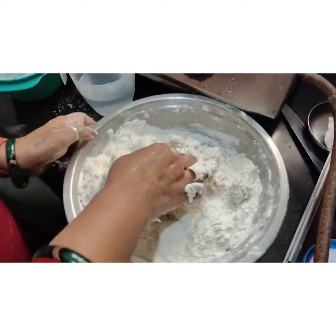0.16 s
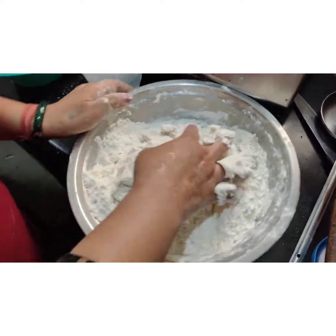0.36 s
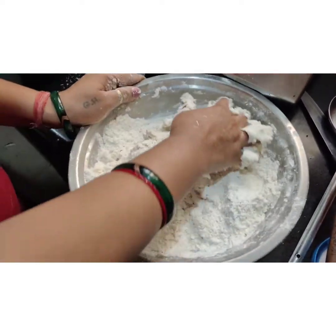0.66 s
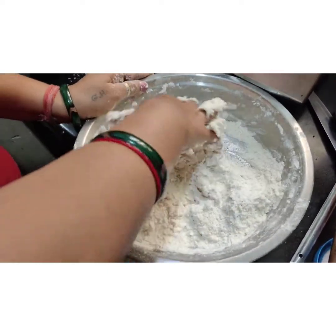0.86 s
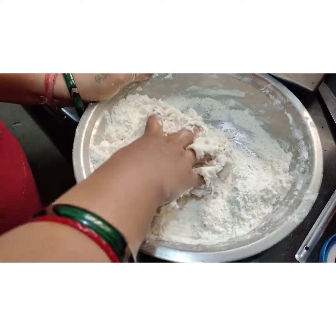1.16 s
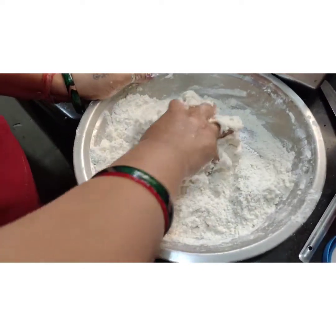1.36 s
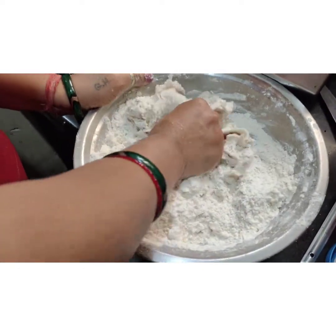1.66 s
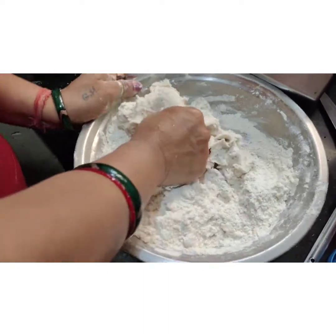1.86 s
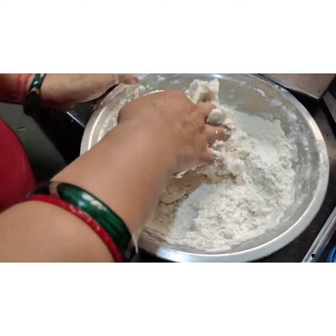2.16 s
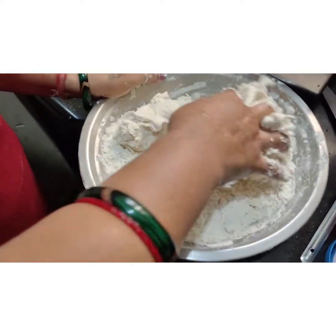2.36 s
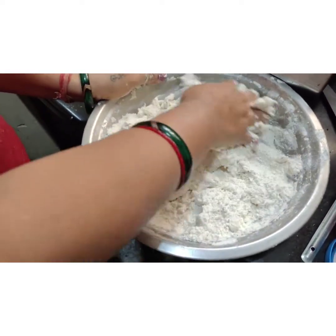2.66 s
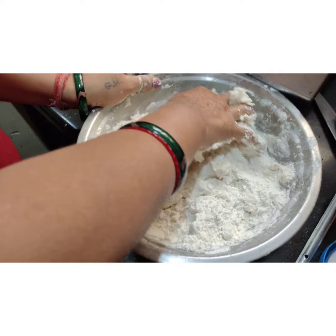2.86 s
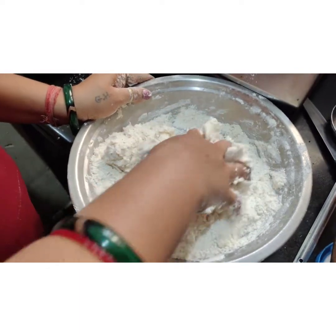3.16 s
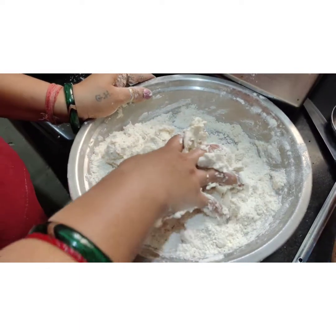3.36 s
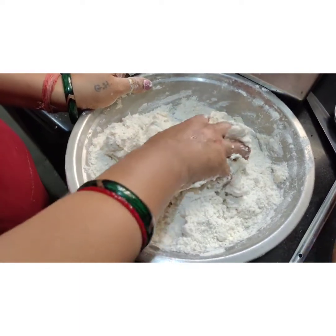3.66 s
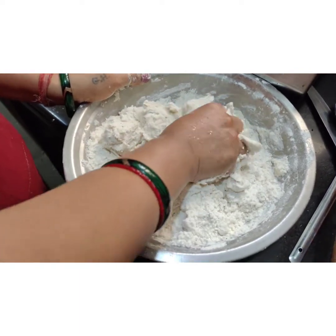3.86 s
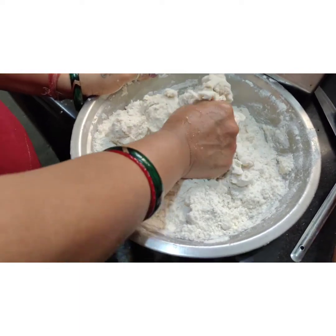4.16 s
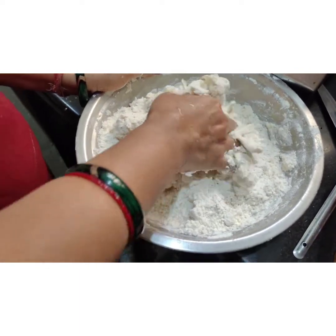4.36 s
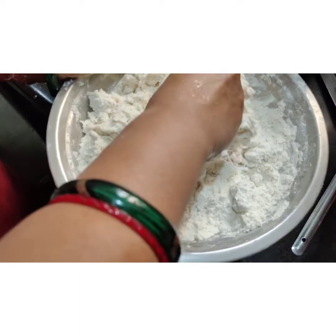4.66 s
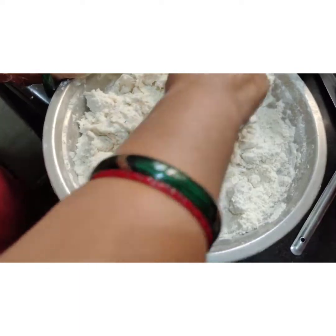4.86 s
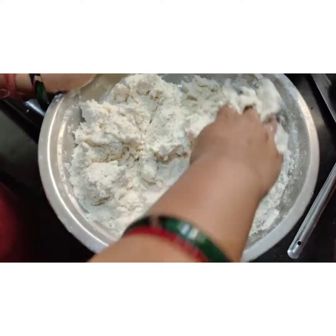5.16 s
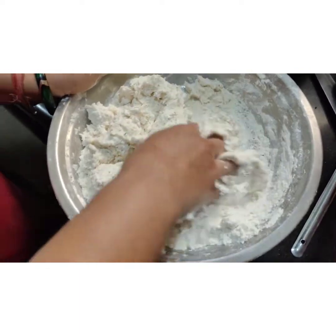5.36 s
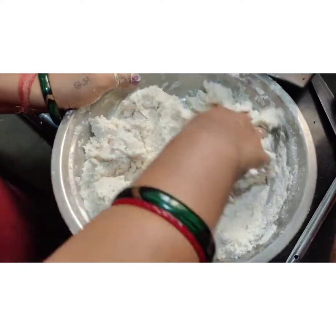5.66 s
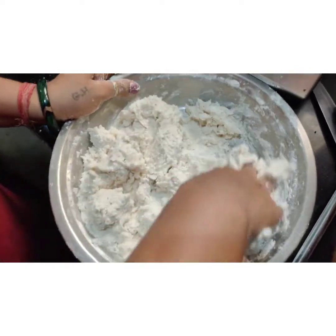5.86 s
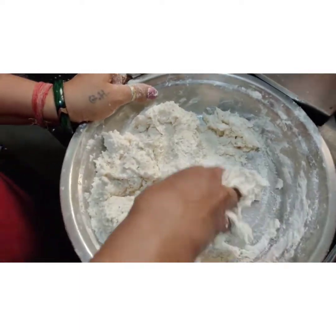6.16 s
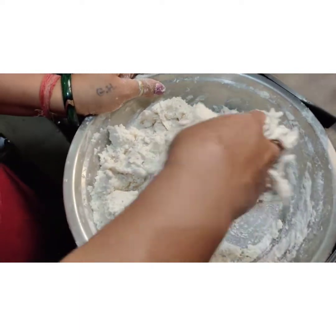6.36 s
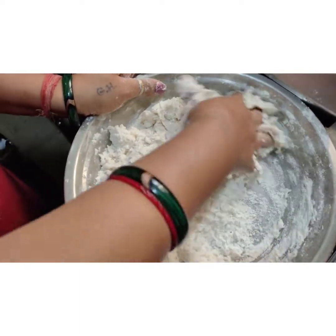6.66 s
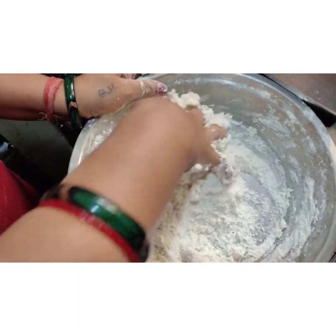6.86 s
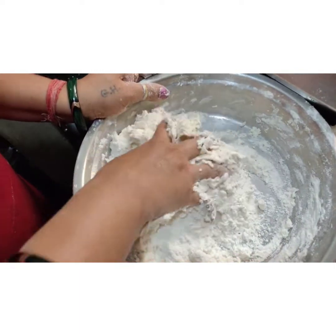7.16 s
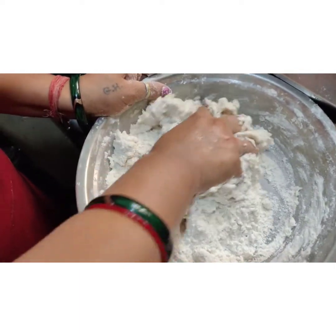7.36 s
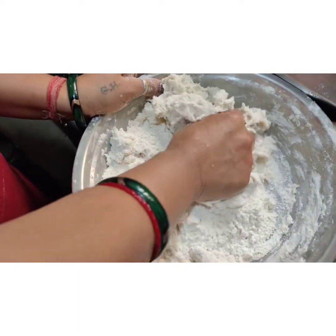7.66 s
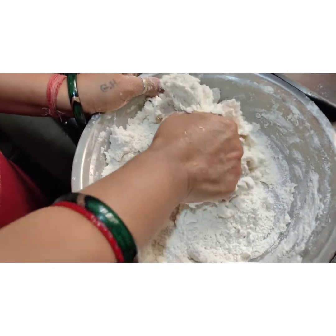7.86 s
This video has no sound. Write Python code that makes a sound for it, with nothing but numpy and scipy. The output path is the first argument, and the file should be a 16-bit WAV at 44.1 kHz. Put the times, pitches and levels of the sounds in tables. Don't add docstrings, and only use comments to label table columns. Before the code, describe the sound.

Dry flour hisses and crunches against a metal bowl as bangles clink and the base thumps, over a distant wavering drone in a kitchen.

```python
import sys
import numpy as np
from scipy import signal
from scipy.fft import rfft, irfft, next_fast_len
from scipy.io import wavfile
from scipy.ndimage import uniform_filter1d

SR = 44100
rng = np.random.default_rng(int(sys.argv[2]) if len(sys.argv) > 2 else 0)


def to_linear_factor(level_db):
    exponent = np.asarray(level_db, float) / 20
    return 10 ** exponent


def pcm_store(signal):
    levels = np.round(np.clip(np.atleast_2d(signal), -1, 1) * 32767)
    wavfile.write(sys.argv[1], SR, levels.astype(np.int16).T)


N = 353241

# pitch_hz, level_db (per Hz)
AIR_SPECTRUM = [(15, -60), (25, -20), (175, -1.5), (607, -4), (677, -16.5), (1840, -13), (4370, -28),
                (6000, -34.5), (13000, -29), (16000, -38)]
# pitch_hz, likeness (0-1)
MIC_LIKENESS = [(60, 0.64), (99, 0.58), (160, 1), (270, 0.96), (450, 0.7), (740, 0.31), (1220, 0.059),
                (2010, 0.15), (3330, 0.06), (5500, 0.92), (9080, 1), (15000, 0.11)]
# pitch_hz, left_minus_right_db
MIC_LEAN = [(60, 3), (92, 2), (140, 4.5), (210, -4), (330, 1), (500, -2.5), (770, -2), (1170, 1.5),
            (1790, 0), (2740, 7.5), (4190, 9.5), (6410, -0.5), (9810, -7), (15000, -19.5)]
# start_s, level_db
MOTOR_RUMBLE = [
    [(0.0, -52), (1.1, -56), (1.45, -50), (1.7, -65.5), (2.07, -85.5), (2.31, -55.5), (2.6, -60.5),
     (3.3, -54), (4.35, -65.5)],
    [(4.42, -92), (4.55, -49.5), (4.82, -82.5), (5.5, -95.5), (5.7, -60), (5.95, -81.5), (6.25, -64),
     (7.3, -67), (8.01, -80.5)],
]
# peak_s, rise_s, fall_s, level_db
DRONE_SURGES = [(0.08, .3, 0.24, -52.5), (0.75, 0.95, 0.56, -55), (1.07, 0.45, 0.08, -50.5),
                (1.27, 0.052, 0.11, -51.5), (1.42, 0.046, 0.11, -51), (1.83, 0.27, 0.23, -64),
                (2.36, 0.082, 0.11, -50.5), (2.86, .12, 0.049, -62), (3.44, 0.66, 0.2, -55.5),
                (3.73, 0.21, 0.056, -51.5), (4.19, 0.23, 0.3, -45.5), (4.35, 0.19, .3, -41.5),
                (4.53, 0.083, 0.28, -62), (5.28, 0.065, 0.36, -68.5), (5.61, 0.038, 0.074, -49.5),
                (6.5, 0.23, 0.55, -59), (6.95, 0.25, 0.21, -62.5), (7.24, 0.15, 0.35, -50.5),
                (7.449, 0.15, 0.26, -54.5), (7.93, 0.26, 0.075, -55.5)]
# start_s, pitch_hz, roughness (0-1)
DRONE_PITCH = [(0, 178, .7), (0.8, 175, .6), (1.4, 175, .6), (3.2, 175, .8), (3.95, 178, .7),
               (4.1, 181, .12), (4.36, 181, .12), (4.5, 177, .8), (7.0, 173, .6), (7.15, 172, .25),
               (7.6, 172, .3), (8.01, 176, .5)]
# start_s, level_db (peak), pitch_hz, t60_s
THUMPS = [(0.009, -41, 262, 0.18), (0.245, -38, 320, 0.6), (0.3618, -30, 280, 0.2),
          (1.405, -31.5, 220, 0.43), (1.428, -33.5, 228, 0.45), (2.252, -36, 323, 0.34),
          (2.416, -31.5, 249, 0.089), (3.355, -37, 193, 0.28), (4.494, -30.5, 287, 0.33),
          (5.602, -39, 250, 0.1), (5.612, -29, 238, 0.1), (5.619, -30, 260, 0.15), (6.415, -36, 311, 0.23),
          (7.471, -43.5, 400, 0.3), (2.33, -39, 290, 0.44)]
# start_s, level_db (peak), brightness_db, rattle_db, rattle_t60_s
CLINKS = [(0.244, -36, -23, -1, 0.2), (0.3728, -7.5, -8.5, -21, 0.2), (0.6992, -36, -12, -1, 0.15),
          (1.57, -32.5, -9, -3, 0.17), (2.2219, -6.5, -16.5, -10, 0.12), (2.3105, -21.5, -13.5, -11.5, 0.5),
          (2.6414, -31.5, -13, 6, 0.13), (2.7536, -39, -32.5, 12, 0.47), (3.44, -38.5, -16, 19.5, 0.3),
          (3.971, -53, -12, -9.5, 0.08), (4.4495, -17, -35.5, -17.5, 0.036), (5.5601, -47, -26.5, 15, 0.43),
          (5.86, -33, -13.5, -18, 0.25), (6.4, -32, -9, -34, 0.2), (6.4347, -40, -23, -18.5, 0.21),
          (7.053, -45.5, -20, 10, 0.44), (7.4603, -39.5, -13, -6, 0.23)]
# pitch_hz, width_hz, level_db
STRUCK_MODES = [(1004, 57, -12), (1672, 18, 2), (2132, 12, 0.5), (2530, 36, 1), (2870, 55, -1.5),
                (3196, 66, -3.5), (3470, 33, -7), (3790, 20, -1), (4050, 51, 1.5), (4300, 25, -0.5),
                (4420, 25, -1), (5136, 20, -5.5), (5460, 25, -11), (5760, 45, -14)]
# start_s, level_db (peak), pitch_hz
CONTACTS = [(0.2453, -27, 4540), (0.3735, -13, 4060), (0.374, -18, 4500), (1.5688, -25, 4160),
            (2.2212, -10, 4100), (2.7531, -34, 3300), (3.4381, -22, 1600), (3.4378, -30, 3200),
            (3.4385, -31, 800), (5.5625, -41, 4150), (4.4506, -15, 4250), (5.0763, -34, 4140),
            (5.0902, -31, 4170), (5.1222, -28, 2520), (5.8093, -33, 4090), (5.917, -30, 2940),
            (5.9465, -24, 4160), (5.957, -26, 3000), (5.965, -23, 4150), (6.4485, -28, 3200),
            (6.3979, -27, 4090), (6.3985, -31, 3050), (7.4594, -31, 3700), (4.4508, -19, 2700),
            (4.451, -21, 1650)]
# start_s, level_db (peak),
# lowest_hz
TICKS = [(1.661, -45, 10000), (1.705, -35, 10500), (1.7712, -35, 10500), (3.2046, -48, 5000),
         (3.4511, -36, 6000), (4.0223, -49.5, 6000), (4.0522, -48, 4000), (4.088, -49, 6000),
         (4.3612, -55, 301), (4.8773, -56, 6040), (4.9721, -54, 6000), (5.9135, -35, 3000),
         (6.9532, -47, 5030)]
# start_s, pitch_hz, level_db, t60_s
RINGS = [(0.374, 4220, -33.5, 0.25), (0.374, 5160, -37, .25), (0.374, 5900, -41.5, .2),
         (0.374, 6870, -48.5, .3), (0.374, 10740, -54, .25), (0.374, 11300, -53, 0.44),
         (0.374, 11870, -50.5, .15), (2.222, 4240, -36.5, .3), (2.222, 1676, -36, 0.61),
         (4.451, 4115, -47, 0.36), (2.222, 9300, -56, .3), (2.222, 9600, -55, .3),
         (2.222, 10080, -48.5, .12), (2.222, 11060, -46, 0.14), (2.222, 11670, -52.5, .3),
         (4.451, 1658, -40, 0.32), (4.452, 2530, -42, 0.29), (4.451, 3180, -43, 0.21),
         (4.451, 9300, -65, .25), (4.451, 10300, -69, 0.26), (7.461, 5000, -49, .1),
         (7.461, 2920, -58, 0.45), (7.5, 1807, -64, .6)]
# start_s, length_s, pitch_hz,
# width_hz, level_db
SQUEAKS = [(0.5, .49, 1100, 530, -60), (0.55, .2, 2870, 90, -62), (1.412, .07, 900, 300, -53),
           (1.605, 0.53, 937, 84, -63.5), (2.6, 0.46, 880, 100, -61), (2.898, 0.067, 650, 170, -56.5),
           (2.93, 0.22, 4300, 1050, -66), (3.125, .15, 1320, 180, -56), (3.14, .075, 1630, 90, -60),
           (3.34, .08, 4400, 150, -63), (3.431, 0.058, 1850, 200, -50), (3.46, .06, 4670, 300, -52),
           (3.519, .45, 4880, 1000, -66.5), (3.54, 0.42, 3280, 380, -65), (3.69, .1, 2880, 54, -69),
           (4.039, 0.33, 331, 6.4, -61.5), (4.096, .18, 562, 49, -65.5), (4.201, 0.2, 3600, 900, -76),
           (3.8, .09, 263, 12, -62), (4.354, 0.11, 3750, 600, -77.5), (4.599, 0.25, 1284, 260, -71.5),
           (4.7, 0.28, 3590, 2000, -75.5), (4.802, 0.17, 4760, 160, -68.5), (4.82, 0.28, 660, 136, -60),
           (4.839, .22, 2594, 60, -72.5), (4.879, .15, 4540, 330, -65), (4.88, .16, 1690, 73, -75),
           (5.072, .14, 1590, 400, -47.5), (5.081, 0.15, 2680, 430, -45.5), (5.56, 0.38, 4080, 140, -52),
           (5.85, .25, 437, 87, -59.5), (5.901, .15, 1590, 170, -46), (6.25, .07, 3375, 170, -78.5),
           (6.258, 0.082, 1094, 140, -73), (6.377, .025, 4060, 250, -54), (6.717, 0.026, 1200, 150, -54),
           (6.816, 0.25, 3710, 280, -73.5), (7.047, 0.28, 804, 200, -60.5), (7.101, .7, 554, 12, -74),
           (7.178, 0.22, 644, 200, -59.5), (7.247, .3, 396, 83, -61.5), (7.44, .24, 350, 30, -60),
           (7.48, 0.11, 870, 49, -63), (7.77, .4, 3800, 600, -75)]
# peak_s, rise_s, fall_s, scrape_db, wall_weight_db
STROKES = [(0.2, .6, 0.19, -46, -12), (0.55, 0.4, 0.38, -47.5, -6.5), (0.7, 0.091, 0.15, -49, -17),
           (1.06, 0.19, 0.18, -58.5, -9), (1.25, 0.23, 0.23, -49.5, -4.5), (1.44, 0.069, 0.34, -58, -1.5),
           (1.9, 0.46, 0.19, -52, -12.5), (2.19, 0.15, 0.011, -64, -10), (2.561, 0.17, 0.24, -47, -7.5),
           (2.858, 0.29, 0.14, -52.5, -22), (3.212, 0.082, 0.09, -53.5, -12.5),
           (3.45, 0.18, 0.15, -48, -13), (3.6, 0.16, 0.13, -55.5, -30), (3.983, 0.042, 0.032, -57.5, -12.5),
           (5.03, 0.15, 0.27, -57.5, -14), (5.14, 0.11, 0.2, -43, -7), (5.76, 0.18, 0.31, -46, -11),
           (5.964, 0.11, 0.1, -40.5, -11), (6.461, 0.061, 0.3, -45.5, -6), (6.64, 0.27, 0.15, -48.5, -10),
           (6.96, 0.039, 0.062, -63, -4.5), (7.148, 0.13, 0.24, -48.5, -9), (7.33, 0.13, 0.34, -62.5, -6),
           (7.93, 0.13, .3, -77, -1)]
# start_s, fall_s, scrape_db, wall_weight_db
JOLTS = [(0.375, 0.14, -31, -9.5), (1.57, 0.1, -38.5, -9.5), (2.22, 0.21, -33, -14), (3.35, 0.16, -55, 1),
         (4.453, 0.11, -38.5, -6.5), (6.398, 0.13, -45, -5.5), (7.459, 0.093, -42.5, -10),
         (7.58, 0.13, -59, -14), (5.075, 0.17, -48.5, -8), (5.562, 0.2, -62, -2.5), (5.915, 0.13, -42, -11),
         (7.053, 0.24, -58, -6)]
# peak_s, rise_s, fall_s, level_db
PRESSES = [(0.0, 0.0063, 0.24, -45.5), (0.255, 0.018, 0.28, -38.5), (0.36, 0.0035, 0.03, -32.5),
           (0.4, .03, 0.21, -47), (1.25, 0.38, 0.48, -58), (1.421, 0.018, 0.13, -39.5),
           (1.584, .02, 0.2, -65), (2.188, 0.09, 0.014, -59.5), (2.27, 0.03, 0.32, -43.5),
           (2.439, 0.13, 0.054, -44.5), (3.33, .045, .05, -70), (3.449, 0.083, 0.17, -43.5),
           (4.32, .15, 0.027, -63), (4.435, .012, 0.018, -62), (4.504, 0.043, 0.11, -38.5),
           (4.91, 0.2, 0.32, -60), (5.15, 0.086, 0.22, -53.5), (5.28, 0.14, 0.044, -56.5),
           (5.63, 0.047, 0.14, -40), (5.872, 0.16, 0.11, -48), (6.413, 0.014, 0.58, -48),
           (6.637, 0.22, 0.075, -51), (7.32, 0.21, 0.19, -57), (7.518, .1, 0.15, -52)]
# peak_s, rise_s, fall_s, level_db
SIFTS = [(0.3, .15, 0.079, -80), (0.78, .1, 0.057, -77), (2.9, 0.092, .1, -84), (3.21, 0.019, 0.073, -63),
         (3.68, 0.16, 0.26, -68), (4.93, 0.08, 0.12, -72.5), (5.8, 0.22, 0.26, -53),
         (5.03, 0.073, 0.11, -59), (5.27, .12, 0.083, -59), (5.58, 0.024, 0.2, -62.5),
         (6.72, 0.12, .06, -70), (7.25, .1, 0.071, -77)]
# squeeze_db, wall_db, scrape_db, dust_db
IDLE_DB = [
    (-75, -75.5, -75.5, -80.5),
    (-115, -80, -90, -87),
]
LAYER_EDGES_HZ = [220, 600, 1400, 7200, 15800]
# pitch_hz, level_db (per Hz)
FLOUR_SPECTRUM = [(120, -36), (200, 2), (311, 5.5), (416, -5), (519, -4), (867, -11), (1400, -10),
                  (1590, 3.5), (2210, 2), (2610, 5), (3760, 3.5), (4120, 5.5), (7600, -7.5), (14900, -12),
                  (16000, -20)]
# pitch_hz, width_hz, level_db
RUBBED_MODES = [(960, 230, -0.5), (1744, 74, -1.5), (2620, 65, -16.5), (3040, 190, -16.5), (4210, 130, -8),
                (4430, 33, -14), (2145, 17, -14.5), (3520, 40, -10), (3770, 19, -7.5), (5340, 46, -6.5)]
# pitch_hz, share_lost (0-1)
TREBLE_HOLES = [(6600, 0.0042), (8200, 0.42), (9500, 0.015), (11500, 0.06), (14000, 0.082)]
# start_s, length_s
STARVED = [
    (0.4, .075),
    (2.235, .06),
    (4.458, .03),
]
# low_hz, high_hz
STARVED_BANDS_HZ = [(9450, 9650), (10250, 10650), (11350, 11550), (11950, 12350), (12800, 13100)]

AIR_DB = -72.5
SCENE_CHANGE_S, KITCHEN_T60_S, TOP_HZ = 4.363, 0.4, 15850
RUMBLE_HZ, THROB_HZ = 106.8, 32.5
DRONE_UNDER_DB, UNDERTONE_DB = -6, -10.5
WAVER_DB = 3
STRUCK_WIDTH_HZ, STRUCK_DB, RINGING_DB = 170, 6, 15
RING_WIDTH_HZ, TICK_S = 27, 0.001
REACH_DB = 20
SURGE_ROUND, STROKE_ROUND, JOLT_ROUND, PRESS_ROUND, DUST_ROUND = 1.42, 1.65, 1.05, 0.78, 1.67
JOLT_RISE_S, JOLT_DUST_DB, PRESS_ON_WALL_DB = 0.0013, -14, -10.5
DUST_DB, DUST_FOLLOWS = -54.5, 1
DUST_CEILING_DB, DUST_SPREAD = -46, 0.92
LUMPY_DB, LUMPS_PER_S = 1.2, 70


def rms_one(x):
    middle = np.atleast_2d(x).mean(axis=0)
    return x / np.sqrt(np.mean(middle ** 2) + 1e-20)


def stretch(coarse):
    return np.interp(np.arange(N) / 40, np.arange(len(coarse)), coarse)


def slow(rate):
    r = np.exp(-80 * np.pi * rate / SR)
    noise = rng.standard_normal(N // 40 + 2002)
    return rms_one(signal.lfilter([1], [1, -2 * r, r * r], noise)[2000:])


def drift(rate):
    return stretch(slow(rate))


def in_time(tables):
    rows = list(tables[0])
    for table in tables[1:]:
        start = max(table[0][0] - .015, rows[-1][0] + .001)
        rows += [(start, *rows[-1][1:]), (start + .001, *table[0][1:])]
        rows += list(table)
    s, *columns = np.transpose(rows)
    return [np.interp(np.arange(N) / SR, s, c) for c in columns]


def at_hz(points, hz):
    point_hz, value = np.array(points)[:, 0], np.array(points)[:, 1]
    return np.interp(np.log(hz), np.log(np.maximum(point_hz, 1)), value)


def swells(s, rise, fall, db, roundness):
    since = np.arange(0, N + 40, 40) / SR - s[:, None]
    reach_s = np.where(since < 0, rise[:, None], fall[:, None])
    away = np.abs(since) / np.maximum(reach_s, .002)
    level_db = db[:, None] - REACH_DB * np.minimum(away, 50) ** roundness
    return stretch(to_linear_factor(2 * level_db).sum(axis=0))


def resonance(x, hz, width_hz):
    r = np.exp(-np.pi * width_hz / SR)
    poles = [1, -2 * r * np.cos(2 * np.pi * hz / SR), r * r]
    return signal.lfilter(np.array([1, 0, -1]) * (1 - r * r) / 2, poles, x)


def mic_lean(hz):
    return to_linear_factor(at_hz(MIC_LEAN, hz) / 2 * np.array([[1], [-1]]))


def microphones(sources, low_hz, high_hz, spectrum, patchy_db, count=3):
    bands = int(np.ceil(count * np.log2(high_hz / low_hz)))
    edges = np.geomspace(low_hz, high_hz, 1 + bands)
    out, together = 0, slow(12.0)
    for k, (low, high) in enumerate(zip(edges, edges[1:])):
        band = signal.butter(2, [low, high], "band", fs=SR, output="sos")
        pair = signal.sosfilt(band, sources[k % len(sources)])
        hz = np.sqrt(low * high)
        alike = np.clip(at_hz(MIC_LIKENESS, hz), -1, 1)
        flicker_db = patchy_db * (.4 * together + slow(8.0))
        gain = stretch(to_linear_factor(at_hz(spectrum, hz) + flicker_db))
        mix = np.sqrt([1 + alike, 1 - alike]) * [[1, 1.0], [1, -1.2]]
        out = out + gain * (mic_lean(hz) * mix @ pair)
    return out


def room_air():
    noise = rng.standard_normal((2, 2, N))
    return to_linear_factor(AIR_DB) * rms_one(microphones(noise, 30, 15800, AIR_SPECTRUM, patchy_db=1.0, count=2))


def kitchen(x):
    size = next_fast_len(N + SR)
    w = 2 * np.pi * np.arange(size // 2 + 1) / size
    dry, out = rfft(x, size), np.zeros((2, N))
    t60 = KITCHEN_T60_S / (1 + (w * SR / (2 * np.pi * 7000)) ** 2)
    delays = (rng.uniform(0.0073, .03, (2, 6)) * SR).astype(int)
    for side, lags in enumerate(delays):
        loops = [to_linear_factor(-60 * lag / SR / t60) * np.exp(-1j * w * lag) for lag in lags]
        echoes = sum(g / (1 - g) for g in loops)
        out[side] = irfft(dry[side] * echoes, size)[:N]
    return out


def motor():
    t, white = np.arange(N) / SR, rng.standard_normal((3, N))
    rumble_db, = in_time(MOTOR_RUMBLE)
    rows = np.array(DRONE_SURGES)
    early = swells(*rows[rows[:, 0] < SCENE_CHANGE_S].T, SURGE_ROUND)
    late = swells(*rows[rows[:, 0] > SCENE_CHANGE_S].T, SURGE_ROUND)
    surge = np.where(t < SCENE_CHANGE_S, early, late)
    drone = np.sqrt(surge + to_linear_factor(2 * (rumble_db + DRONE_UNDER_DB)))
    rumble = rms_one(resonance(resonance(white[0], RUMBLE_HZ, 24), RUMBLE_HZ, 30))
    drone_hz, hoarse = in_time([DRONE_PITCH])
    hoarse = np.clip(hoarse, 0, 2)
    wander = np.cumsum(drone_hz * (1 + 0.004 * drift(2.5))) / SR
    throb = 1 + 0.12 * np.sin(2 * np.pi * THROB_HZ * t)
    tone = np.sqrt(2) * np.sin(2 * np.pi * wander) * throb
    tone += to_linear_factor(UNDERTONE_DB) * np.sqrt(2) * np.sin(2 * np.pi * (wander - THROB_HZ * t))
    rough = rms_one(resonance(resonance(white[1], 173, 30), 186, 53))
    voice = (tone + hoarse * rough) / np.sqrt(1 + hoarse ** 2)
    mid = to_linear_factor(rumble_db + WAVER_DB * drift(7.0)) * rumble + drone * voice
    side = drone * to_linear_factor(-14.5) * rms_one(resonance(resonance(white[2], 160, 80), 160, 80))
    return mid + side * [[1], [-1]]


def thumps():
    out, t = np.zeros(N), np.arange(SR // 2) / SR
    for (s, db, hz, t60), rattle in zip(THUMPS, rng.standard_normal((len(THUMPS), SR // 2))):
        push = np.sin(2 * np.pi * hz * t) * np.exp(-t / 0.0092) * (1 - np.exp(-t / 0.0026))
        tail = rms_one(resonance(rattle, hz, 87)) * to_linear_factor(-60 * t / max(t60, .03) - 9.5)
        at, knock = round(s * SR), push + tail
        out[at:at + len(t)] += to_linear_factor(db - 2) * (knock / np.abs(knock).max())[:N - at]
    return out


def rings():
    out, t = np.zeros((2, N)), np.arange(SR // 2) / SR
    for (s, hz, db, t60), noise in zip(RINGS, rng.standard_normal((len(RINGS), 2, SR))):
        tone = rms_one(mic_lean(hz) * resonance(noise, hz, RING_WIDTH_HZ))[:, -len(t):]
        fade = to_linear_factor(db - 60 * t / max(t60, .03)) * (1 - np.exp(-t / .002))
        out[:, round(s * SR):][:, :len(t)] += fade * tone
    return out


def ticks():
    out, t = np.zeros((2, N)), np.arange(SR // 50) / SR
    for (s, db, low_hz), noise in zip(TICKS, rng.standard_normal((len(TICKS), 2, len(t)))):
        high_pass = signal.butter(2, low_hz, "high", fs=SR, output="sos")
        burst = signal.sosfilt(high_pass, np.sign(noise) * np.exp(-t / TICK_S))
        tick = mic_lean(1.26 * low_hz) * burst / np.abs(burst).max()
        out[:, round(s * SR):][:, :len(t)] += to_linear_factor(db) * tick
    return out


def contacts():
    out, t = np.zeros((2, N)), np.arange(SR // 50) / SR
    shape = 2 * np.exp(-t / .002) * (1 - np.exp(-t / .0012))
    for s, db, hz in CONTACTS:
        pulse = mic_lean(hz) * shape * np.sin(2 * np.pi * hz * t + [[0], [1.2]])
        pulse = pulse / np.abs(pulse.mean(axis=0)).max()
        out[:, round(s * SR):][:, :len(t)] += to_linear_factor(db - 6) * pulse
    return out


def clinks():
    out, t = np.zeros((2, N)), np.arange(SR // 3) / SR
    noises = rng.standard_normal((len(CLINKS), 2, 2, len(t)))
    luck_db = rng.normal(0, 2.5, (len(CLINKS), len(STRUCK_MODES)))
    broad = signal.butter(3, [900, 5500], "band", fs=SR, output="sos")
    treble = signal.butter(3, [6500, 16500], "band", fs=SR, output="sos")
    crack = np.exp(-t / .002) * (1 - np.exp(-t / .0005))
    for (s, db, bright_db, rattle_db, t60), (dull, sharp), luck in zip(CLINKS, noises, luck_db):
        rattle = to_linear_factor(rattle_db - 60 * t / np.clip(t60, .02, .4))
        drive = np.sign(dull) * crack + dull * rattle
        blow = np.sign(sharp) * crack
        body = to_linear_factor(-12.0) * mic_lean(3000) * signal.sosfilt(broad, drive)
        for (hz, width, mode_db), chance in zip(STRUCK_MODES, luck):
            gain = to_linear_factor(mode_db + chance) * mic_lean(hz)
            body += to_linear_factor(RINGING_DB) * gain * resonance(drive, hz, width)
            body += to_linear_factor(STRUCK_DB) * gain * resonance(blow, hz, STRUCK_WIDTH_HZ)
        tick = np.sign(sharp) * np.exp(-t / 0.0013) + to_linear_factor(-11.0) * sharp * rattle
        tick = to_linear_factor(bright_db + 1.5) * mic_lean(13000) * signal.sosfilt(treble, tick)
        at, loudest = round(s * SR), np.abs(body.mean(axis=0)).max()
        out[:, at:at + len(t)] += to_linear_factor(db) * (0.5 * body / loudest + tick)[:, :N - at]
    return out


def squeaks():
    out = np.zeros((2, N))
    noises = rng.standard_normal((len(SQUEAKS), 2, SR // 2 + SR // 4))
    for (s, length, hz, width, db), noise in zip(SQUEAKS, noises):
        at = round(s * SR)
        size = min(round(length * SR), N - at, noise.shape[1])
        pair = noise + at_hz(MIC_LIKENESS, hz) * noise[::-1]
        tone = resonance(resonance(pair, hz, 1.3 * width), hz, 1.3 * width)
        tone = rms_one(mic_lean(hz) * tone)[:, :size]
        out[:, at:at + size] += to_linear_factor(db) * tone * np.sqrt(np.hanning(size))
    return out


def thin_steel(x):
    hz, t, z = signal.stft(x, SR, nperseg=2048)
    broad = 1 + sum(to_linear_factor(db) / (1 + (2 * (hz - f) / width) ** 2) for f, width, db in RUBBED_MODES)
    chance = uniform_filter1d(rng.standard_normal((len(hz), len(t))), size=9, axis=1)
    chance = uniform_filter1d(uniform_filter1d(chance, size=5, axis=1), size=2, axis=0)
    reach = 1 / (1 + (hz / 9000) ** 2) / (1 + (550 / (hz + 1)) ** 4)
    thicket = to_linear_factor(6.65 * np.clip(chance / chance.std() - .5, 0, 1.6) * reach[:, None])
    return signal.istft(z * broad[:, None] * thicket, SR, nperseg=2048)[1][..., :N]


def hand():
    s, rise, fall, db, weight_db = np.transpose(STROKES)
    at, slide, jolt_db, jolt_weight_db = np.transpose(JOLTS)
    presses = swells(*np.transpose(PRESSES), PRESS_ROUND)
    wall = swells(s, rise, fall, db + weight_db, STROKE_ROUND)
    scrape = swells(s, rise, fall, db, STROKE_ROUND)
    dust_db = DUST_DB + DUST_FOLLOWS * (np.minimum(db, DUST_CEILING_DB) + 47)
    dust = swells(s, DUST_SPREAD * rise, DUST_SPREAD * fall, dust_db, DUST_ROUND)
    jolt_rise = JOLT_RISE_S + 0 * at
    wall_slide, scrape_slide, dust_slide = (swells(at, jolt_rise, slide, jolt_db + shift, JOLT_ROUND)
                                            for shift in (jolt_weight_db, 0, JOLT_DUST_DB))
    wall = wall + wall_slide + to_linear_factor(2 * PRESS_ON_WALL_DB) * presses
    dust = dust + dust_slide + swells(*np.transpose(SIFTS), DUST_ROUND)
    layers = presses, wall, scrape + scrape_slide, dust
    before = np.arange(N) / SR < SCENE_CHANGE_S
    idles = [to_linear_factor(2 * np.where(before, *idle)) for idle in np.transpose(IDLE_DB)]
    return [np.sqrt(power + idle) for power, idle in zip(layers, idles)]


def rubbing():
    chance = 500 * to_linear_factor(4 * drift(20.0)) / SR
    grain = to_linear_factor(3.0 * np.minimum(rng.exponential(1, N), 5))
    crumbs = (rng.random(N) < chance) * grain
    friction = rng.standard_normal((2, 2, N)) * (1 + 3.6 * uniform_filter1d(crumbs, size=12))
    wall = thin_steel(friction)
    out = 0
    for low, high, gain in zip(LAYER_EDGES_HZ, LAYER_EDGES_HZ[1:], hand()):
        layer = rms_one(microphones(wall, low, high, FLOUR_SPECTRUM, patchy_db=1.2))
        out = out + gain * to_linear_factor(LUMPY_DB * drift(LUMPS_PER_S)) * layer
    return out


def scene():
    steel = clinks() + contacts() + ticks()
    low = thumps() * np.ones((2, 1))
    echo = to_linear_factor(-15.0) * kitchen(steel + .5 * low)
    return room_air() + motor() + echo + low + steel + rings() + squeaks() + rubbing()


def dropouts(x):
    hz, t, z = signal.stft(x, SR, nperseg=1024)
    chance = uniform_filter1d(rng.standard_normal((len(hz) // 7 + 1, len(t))), size=4, axis=1)
    ranks = chance.argsort(axis=1).argsort(axis=1) / len(t)
    lost = np.repeat(ranks, 7, axis=0)[:len(hz)] < at_hz(TREBLE_HOLES, hz + 1)[:, None]
    after = sum((t > s) & (t < s + length) for s, length in STARVED)
    starved = sum((hz > low) & (hz < high) for low, high in STARVED_BANDS_HZ)
    lost |= np.outer(starved, after) > 0
    return signal.istft(z * np.where(lost, .03, 1), SR, nperseg=1024)[1][:, :N]


def band_limit(x):
    return signal.sosfilt(signal.butter(12, 16810, fs=SR, output="sos"), x)


def record(dry):
    steep = signal.cheby2(14, 40, TOP_HZ, fs=SR, output="sos")
    mix = dropouts(signal.sosfilt(steep, dry))
    return band_limit(mix)


dry = scene()
out = record(dry)
pcm_store(out)
```